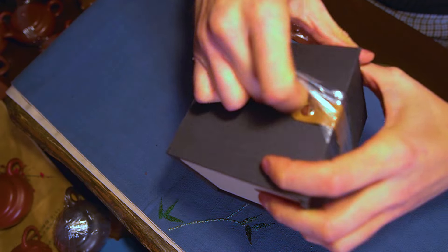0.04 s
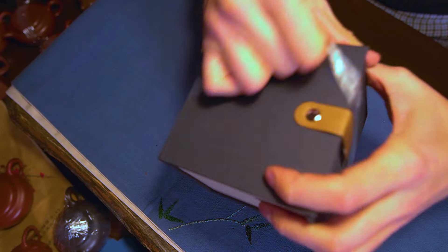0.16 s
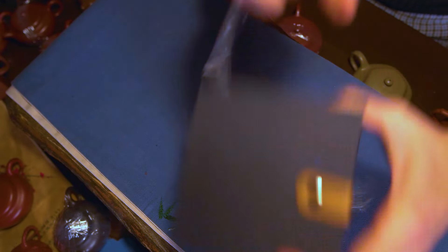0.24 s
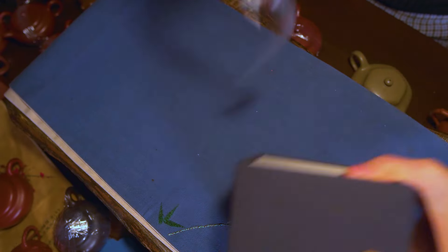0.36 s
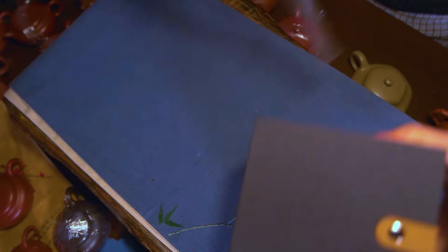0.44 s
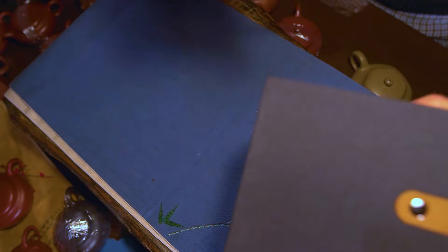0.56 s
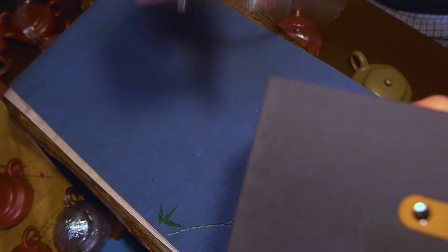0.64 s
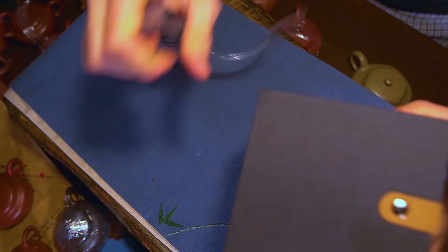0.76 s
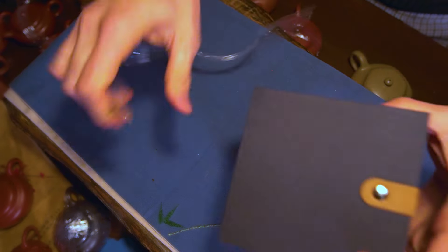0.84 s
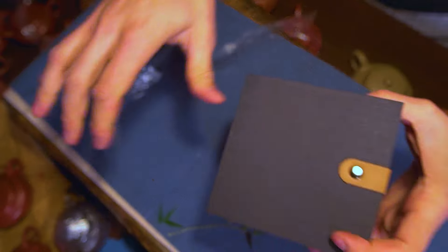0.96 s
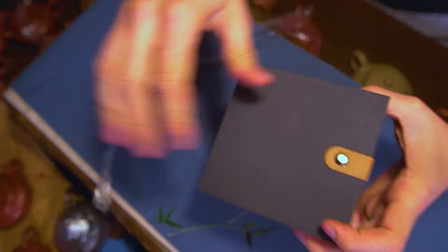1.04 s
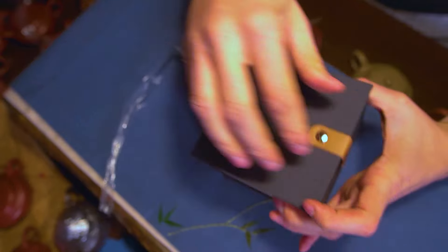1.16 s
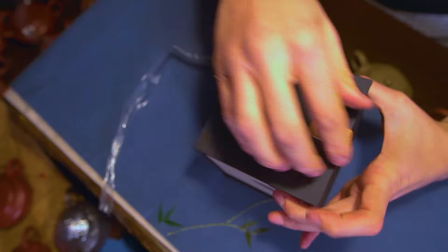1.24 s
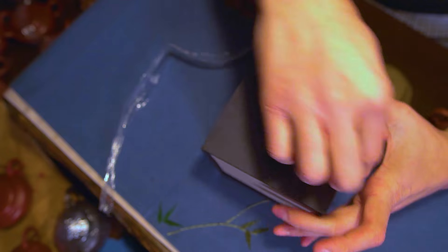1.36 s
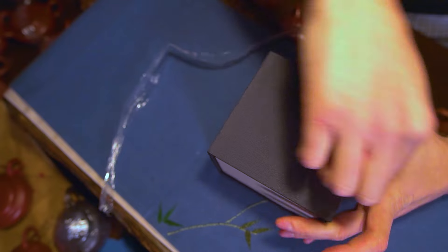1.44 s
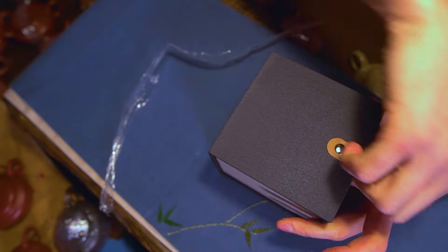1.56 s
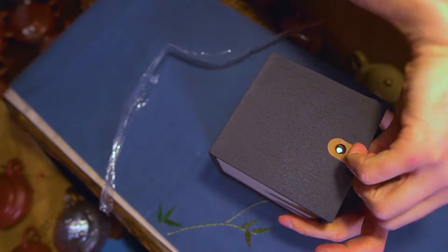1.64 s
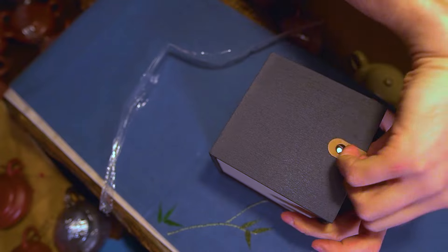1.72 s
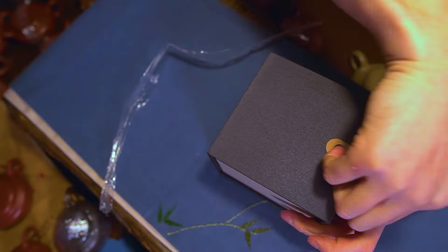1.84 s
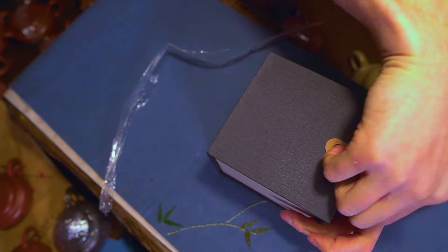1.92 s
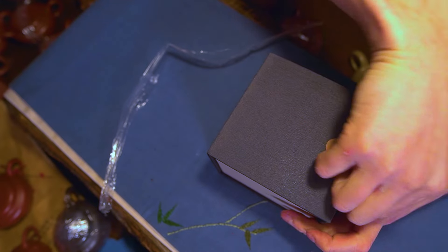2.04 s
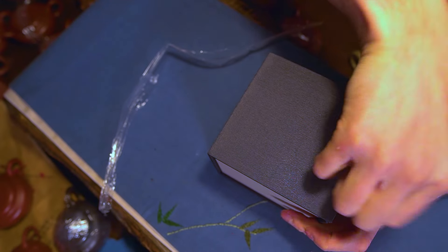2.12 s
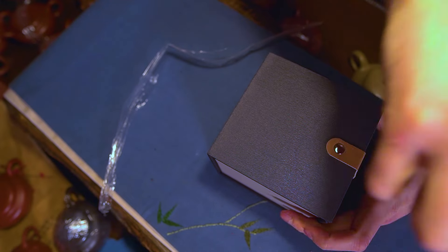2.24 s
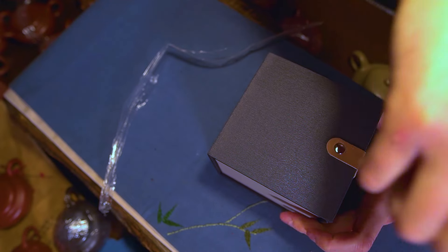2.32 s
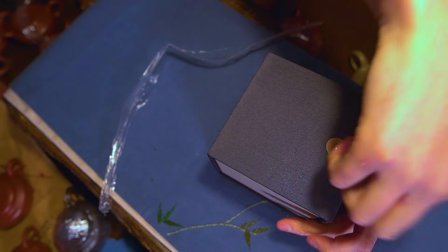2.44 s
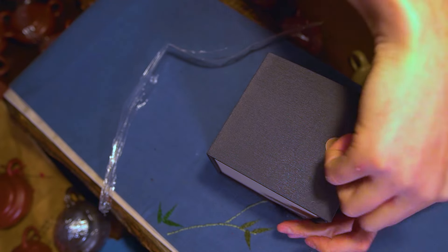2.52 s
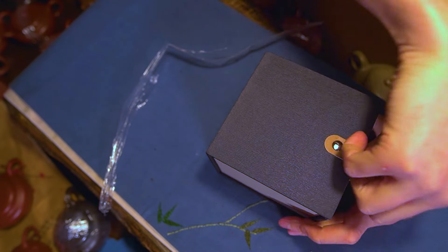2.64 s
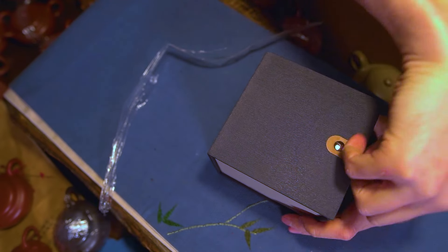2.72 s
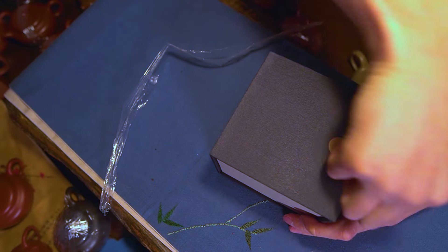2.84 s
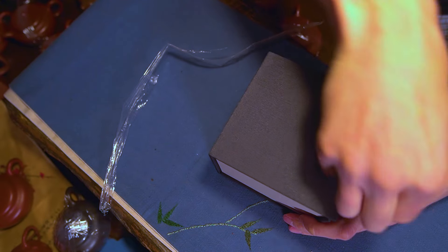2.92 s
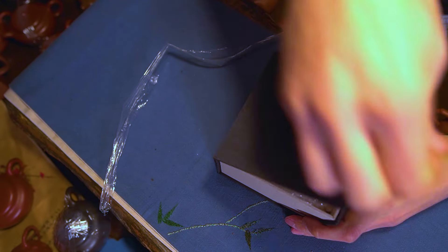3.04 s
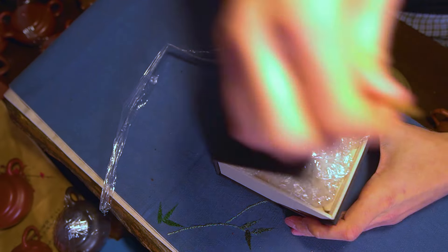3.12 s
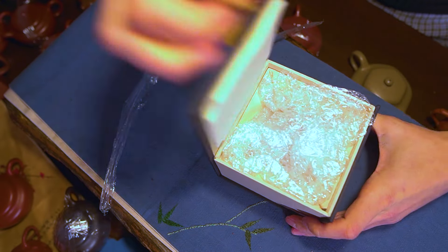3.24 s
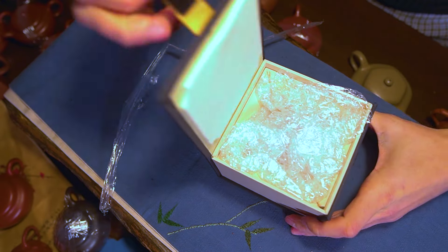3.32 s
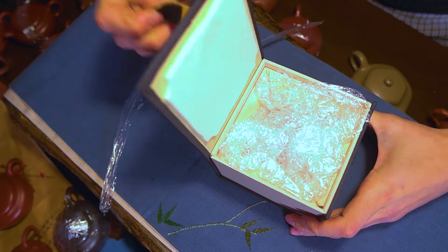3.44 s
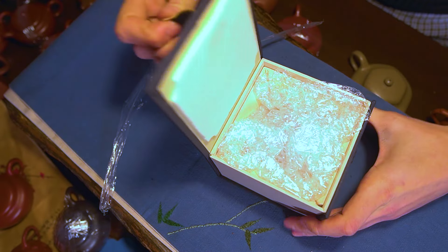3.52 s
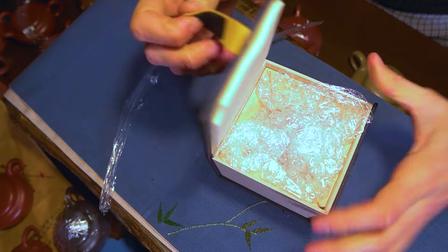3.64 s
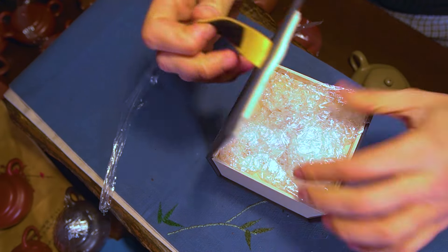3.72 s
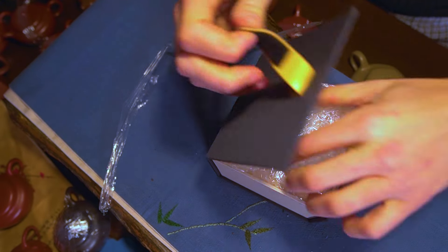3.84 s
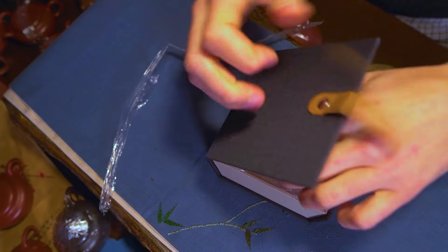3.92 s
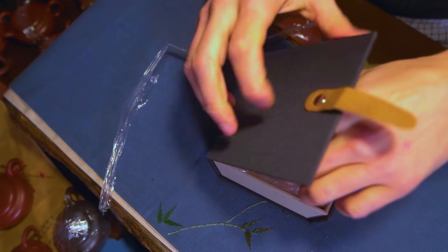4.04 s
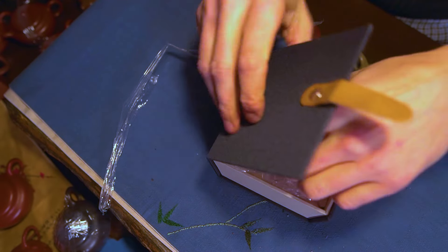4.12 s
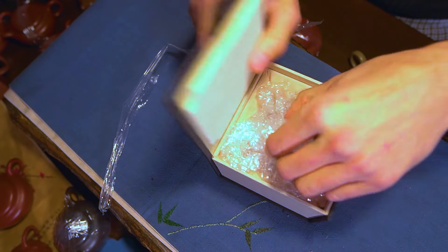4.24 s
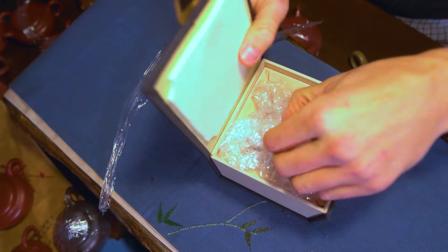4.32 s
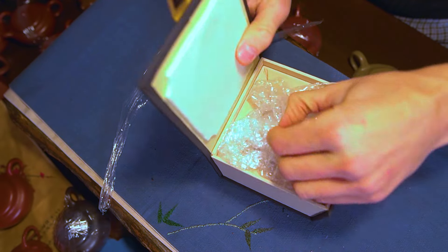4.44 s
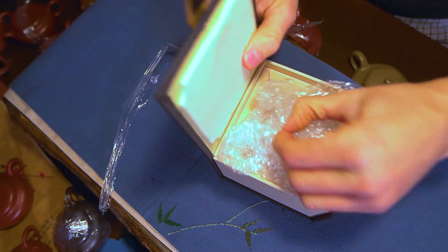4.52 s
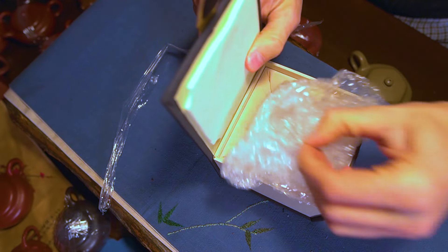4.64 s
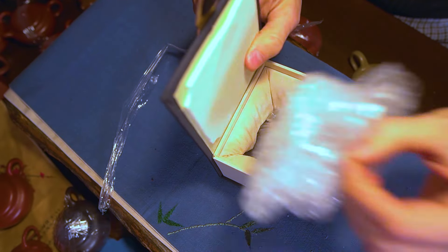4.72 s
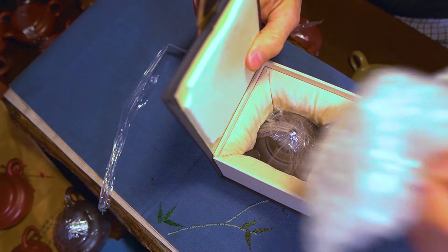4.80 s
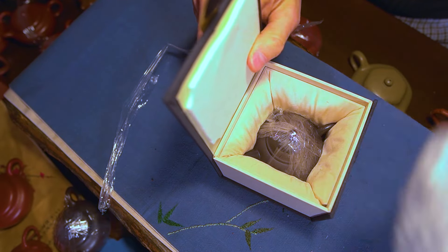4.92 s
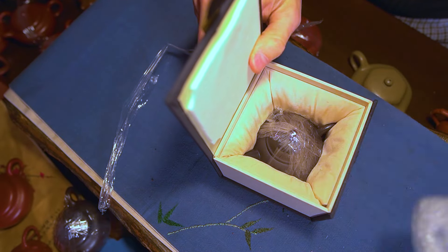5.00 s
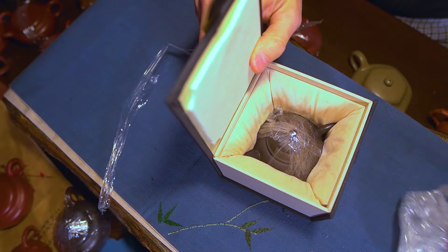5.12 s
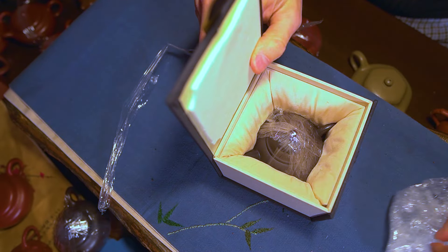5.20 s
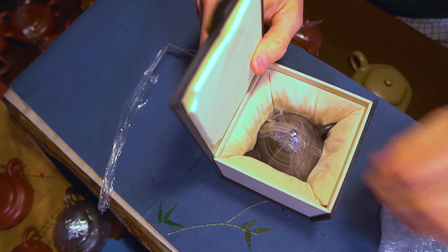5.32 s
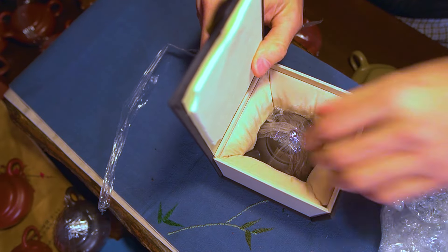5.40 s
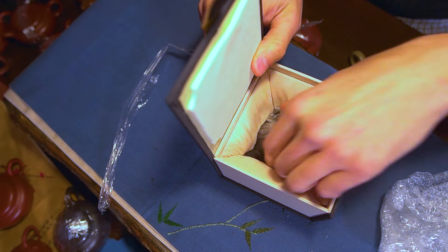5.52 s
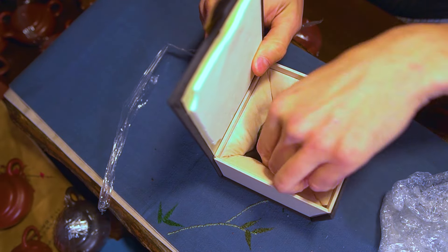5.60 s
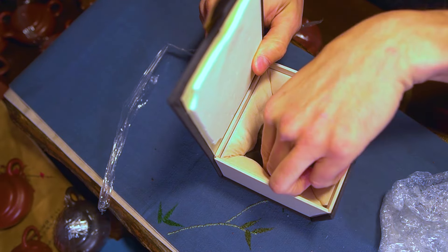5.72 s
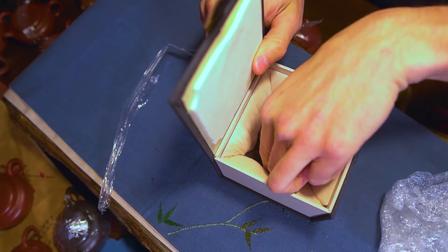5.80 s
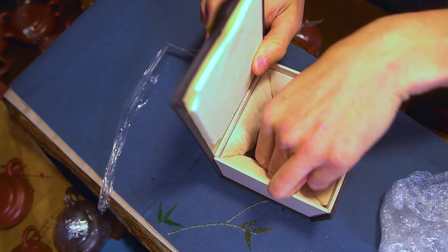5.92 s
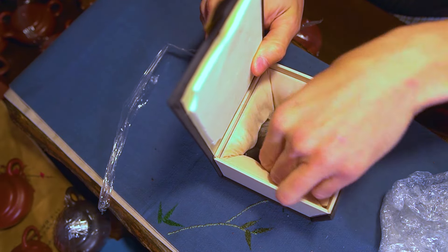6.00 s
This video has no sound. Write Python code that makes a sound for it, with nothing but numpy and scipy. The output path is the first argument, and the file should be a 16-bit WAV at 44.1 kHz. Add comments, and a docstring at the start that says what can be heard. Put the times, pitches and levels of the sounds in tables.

```python
"""Close up at a table, tape is peeled off a cardboard gift box in a dense crackle; the box bumps the table's modes.
The freed strip crinkles as it is laid aside, and fingers brush the lining. The box's leather strap then creaks
over its stud in stick-slip bursts that ring the hollow lid. A pad of bubble wrap is pulled out, crumpling, popping
and fizzing, and is put down; last, fingers rub into the cloth lining. A small room answers over quiet air."""
import sys
import numpy as np
from scipy import signal
from scipy.fft import rfft, irfft, next_fast_len
from scipy.io import wavfile
from scipy.ndimage import uniform_filter1d

SR = 44100
rng = np.random.default_rng(int(sys.argv[2]) if len(sys.argv) > 2 else 0)


def wav_out(sig):
    """Save sig, one row per channel (or a flat mono array), as 16-bit PCM at SR to the path in sys.argv[1]."""
    wavfile.write(sys.argv[1], SR, np.round(np.clip(np.atleast_2d(sig).T, -1, 1) * 32767).astype(np.int16))


N = 267334

# Levels in the tables are relative; some layers also have a trim.
# Gain strokes shared by several sources
STIR_ATTACK_S, STIR_FALL_DB_PER_S = 0.026, 225

# Colour of creasing tape: (frequency [Hz], spectral density [dB])
CRINKLE_COLOUR = [(880, -46), (1500, -34), (2100, -11), (2830, -9), (4080, -3.5), (6000, 5.5), (7840, 4.5),
                  (13800, 7), (16000, -0.5)]
# Colour of rubbed leather: (frequency [Hz], spectral density [dB])
LEATHER_COLOUR = [(400, -15), (900, 7.5), (1080, -2), (1350, -12), (1520, -5), (1780, -11.5), (2200, 3.5),
                  (2600, -3.5), (3000, -5.5), (3400, -7.5), (4800, -6.5), (8000, -10.5), (16000, -16.5)]

# Colour of the glue letting go: (frequency [Hz], spectral density [dB])
TAPE_COLOUR = [(350, -12), (600, -44), (1050, -22), (1230, -5), (1550, 2.5), (2150, 2.5), (2720, 1.5),
               (5790, 2.5), (16000, -1.5)]
# Tape peeling off the box: (time [s], level [dB])
PEEL_LEVEL = [(0.0, -23.5), (0.06, -38), (0.12, -23), (0.16, -37.5), (0.225, -23.5), (0.275, -31),
              (0.32, -21), (0.37, -29), (0.39, -67)]
# Freed strip crinkling as it is carried off: (time [s], level [dB])
STRIP_LEVEL = [(0.38, -40.5), (0.51, -29), (0.58, -47), (0.69, -32), (0.77, -45), (0.87, -44),
               (1.12, -50.5), (1.22, -62)]
# Strip settling on the cloth: (time [s], hold [s], level [dB])
STRIP_SETTLES = [(1.293, 0.098, -45), (1.56, 0.02, -56.5), (1.66, 0.01, -56)]
# Freed strip landing with a short flapping buzz: (time [s], hold [s], level [dB])
FLAP_STROKE = (0.479, 0.052, -34)


def tape():
    """Adhesive fracture: glue lets go in a dense crackle; the freed strip lands with a flap and creases sparsely."""
    tearing = crackle(TAPE_COLOUR, rate=1100, spread_db=6, t60=.005)
    creases = crackle(CRINKLE_COLOUR, rate=650, spread_db=6, t60=.003)
    buckling = pops(rate=450, centre_hz=7000, spread_db=5, cycles=14)
    creases = unit(creases + amp(-4) * buckling)
    buzz_colour = [(2000, -30), (2550, 0), (3000, -1), (3500, -12), (6000, -25)]
    buzz = crackle(buzz_colour, rate=500, spread_db=4, t60=.004)
    settling = sum(stroke(*row, STIR_ATTACK_S, STIR_FALL_DB_PER_S) for row in STRIP_SETTLES)
    loose = level(STRIP_LEVEL) + settling
    flap = stroke(*FLAP_STROKE, attack_s=0.0052, fall_db_per_s=604)
    return amp(-2) * level(PEEL_LEVEL) * tearing + amp(-3.5) * loose * creases + amp(-4.5) * flap * buzz


# Colour of the lower crack: (frequency [Hz], spectral density [dB])
CRACK_COLOUR = [(400, -16), (1000, 12), (2000, 8.5), (4000, 18.5), (7000, -29.5), (14000, -12.5)]
# Creases snapping in tape and wrap: (time [s], tick peak [dB], low crack peak [dB])
CREASE_SNAPS = [(0.021, -15, -41), (0.1247, -6, -43), (0.166, -12.5, -40), (0.196, -10.5, -35),
                (0.2279, -9.5, -20), (0.2586, -16, -30), (0.3106, -37, -27), (0.4853, -17, -33),
                (0.5037, -14, -35), (0.5321, -10, -47), (0.5922, -12.5, -51.5), (0.6227, -13.5, -60),
                (0.6837, -16.5, -39), (0.773, -18.5, -39.5), (0.84, -17.5, -54), (0.878, -17, -51),
                (0.93, -21.5, -46), (1.102, -29.5, -67), (1.366, -26, -57), (3.34, -26, -41.5),
                (3.9387, -20, -34), (4.286, -11.5, -24.5), (4.4083, -19, -27), (4.4426, -11.5, -21.5),
                (4.6734, -17, -18), (4.731, -30, -15.5), (4.762, -40, -25), (4.997, -29, -32),
                (5.0808, -23, -32.5), (5.1683, -23, -34), (5.2114, -22, -31)]
TICK_TRIM_DB, CRACK_TRIM_DB = 0.5, 8


def snaps():
    """Snap-through buckling: single large creases flip over, a bright tick with a lower crack."""
    out = np.zeros((2, N))
    for s, tick_db, crack_db in CREASE_SNAPS:
        tick = stereo(colour(burst(t60=.02), CRINKLE_COLOUR))
        crack = stereo(colour(burst(t60=.016), CRACK_COLOUR))
        add(out, s, amp(tick_db + TICK_TRIM_DB) * tick / np.abs(tick).max())
        add(out, s, amp(crack_db + CRACK_TRIM_DB) * crack / np.abs(crack).max())
    return out


# Tape, then wrap, dragging on the hollow box: (time [s], hold [s], level [dB], swell over the hold [dB])
BOX_DRAGS = [(0.083, 0.35, -38, 13), (3.856, 0.58, -41.5, -1.5), (4.653, 0.15, -33.5, -4.5)]
# Tugs at the strap: (time [s], hold [s], hollow body level [dB], rasp level [dB], swell over the hold [dB])
STRAP_TUGS = [(1.535, 0.046, -45.5, -59, 3.5), (1.624, 0.087, -52.5, -65, 11),
              (1.724, 0.054, -41.5, -43, 7), (1.822, 0.11, -27, -22.5, 3), (2.023, 0.0077, -25, -26, -4.5),
              (2.084, 0.075, -27, -22.5, 0.5), (2.519, 0.15, -42, -52, 11.5),
              (2.691, 0.024, -26.5, -40.5, 6), (2.767, 0.015, -32.5, -37.5, -5),
              (2.785, 0.008, -38, -28, -7), (2.866, 0.11, -18, -25, 4.5)]
TUG_ATTACK_S, TUG_FALL_DB_PER_S, RASP_FALL_DB_PER_S = 0.006, 306, 278
STRAP_PATCHY_DB = 1.2  # rms colour shift with grip


def creak():
    """Stick-slip friction: small slips of strap, tape and wrap drum on the box; the strap rasps at the stud."""
    catches = ticks(rate=350, spread_db=4)
    # soft, dull contacts
    catches = colour(catches, [(500, 5.5), (1000, -0.5), (2000, -9.5), (4000, -8)])
    body = steady(hollow(catches, vary_db=1.57), size=900)
    grain = crackle(LEATHER_COLOUR, rate=600, spread_db=4, t60=.009)
    drag = 0
    for s, hold_s, db, swell_db in BOX_DRAGS:
        drag = drag + stroke(s, hold_s, db, TUG_ATTACK_S, TUG_FALL_DB_PER_S, swell_db)
    rasp = 0
    for s, hold_s, body_db, rasp_db, swell_db in STRAP_TUGS:
        drag = drag + stroke(s, hold_s, body_db, TUG_ATTACK_S, TUG_FALL_DB_PER_S, swell_db)
        rasp = rasp + stroke(s, hold_s, rasp_db, TUG_ATTACK_S, RASP_FALL_DB_PER_S, swell_db)
    return amp(-3) * drag * body + amp(-1.5) * rasp * shifting(grain, STRAP_PATCHY_DB)


# Largest knocks and slips on the box, from tape, strap, wrap and fingers:
# (time [s], body peak [dB], crack peak [dB])
BOX_KNOCKS = [(0.067, -24.5, -59), (0.218, -20, -46), (1.729, -16, -57), (1.744, -18, -41),
              (1.777, -18.5, -35), (1.824, -10.5, -23), (1.852, -19, -23), (1.87, -16, -13),
              (1.92, -11, -14), (2.022, -32, -33), (2.085, -30, -17), (2.094, -16, -12.5),
              (2.135, -16.5, -20), (2.166, -6.5, -44), (2.528, -26.5, -65), (2.686, -34, -28),
              (2.763, -23, -36), (2.785, -30, -18), (2.867, -19, -40), (2.88, -17, -16), (2.918, -14, -9),
              (2.96, -8.5, -21), (2.984, -10, -17.5), (3.019, -28, -41), (3.847, -31.5, -33),
              (4.177, -20, -19.5), (5.548, -28.5, -34)]


def knocks():
    """Impact excitation: each large knock or slip kicks the box and cracks; a weaker crack, a softer, duller kick."""
    out, t = np.zeros((2, N)), np.arange(8192) / SR
    for s, body_db, crack_db in BOX_KNOCKS:
        contact_s = .0001 * np.clip(amp((body_db - crack_db + 8) / 2), .4, 5)
        ring = hollow(t * np.exp(-t / contact_s), vary_db=2.5)
        crack = stereo(colour(burst(t60=.022), LEATHER_COLOUR))
        add(out, s, amp(body_db - 3.5) * ring / np.abs(ring).max())
        add(out, s, amp(crack_db + 1.5) * crack / np.abs(crack).max())
    return out


# Modes of the hollow box: (frequency [Hz], bandwidth [Hz], level [dB])
BOX_MODES = [(366, 5.2, -0.5), (424.4, 84, 0), (458.5, 8.4, 10), (483, 10, -9), (626, 92, -5),
             (791, 52, -8), (895, 12.3, -1), (951, 18, 0), (975, 14, -17), (1340, 17, -59),
             (1526, 15, -33.5), (2107, 35, 5.5), (2853, 133, -5.5)]


def hollow(force, vary_db, low_hz=310):
    """Modal resonance: box modes, randomly weighted for the place touched; so small a box radiates no bass."""
    gains = vary_db * rng.standard_normal(len(BOX_MODES))

    def modes(f):
        total = 0
        for (centre, width, db), gain_db in zip(BOX_MODES, gains):
            damping = 1j * f * width
            total = total + amp(db + gain_db) * damping / (centre * centre - f * f + damping)
        return total
    no_bass = signal.butter(6, low_hz, "high", fs=SR, output="sos")
    return signal.sosfilt(no_bass, filtered(force, modes))


# Stud ringing as the strap comes off: (time [s], hold [s], level [dB])
STUD_STROKE = (2.925, 0.068, -27.5)
# Colour of the stud: (frequency [Hz], spectral density [dB])
STUD_COLOUR = [(700, -29.5), (950, -3), (1040, -4.5), (1100, -9), (1170, -10), (1300, -21), (2500, -25)]


def stud():
    """Friction-driven ringing: the stud rings as the strap is dragged off it."""
    ring = crackle(STUD_COLOUR, rate=500, spread_db=3, t60=.008)
    return stroke(*STUD_STROKE, attack_s=.04, fall_db_per_s=188) * ring


# Colour of the crumpling pockets: (frequency [Hz], spectral density [dB])
CRUMPLE_COLOUR = [(100, -54), (250, -12), (450, -7.5), (600, -23), (800, -3), (1080, -2.5), (1250, -17.5),
                  (1480, 5.5), (1800, -12), (2200, -4), (3100, -0.5), (4500, -5), (6500, -5), (10000, -32)]
# Colour of the thin film: (frequency [Hz], spectral density [dB])
FIZZ_COLOUR = [(2500, -13), (4500, -3), (6500, 2.5), (10000, 2.5), (16000, -1.5)]
# Pulling the bubble wrap out: (time [s], effort [dB])
WRAP_EFFORT = [(3.833, -86), (3.843, -33.5), (4.05, -41.5), (4.1, -32), (4.23, -34), (4.3, -30.5),
               (4.45, -27), (4.56, -31), (4.67, -22.5), (4.75, -24), (4.8, -35), (4.95, -44.5), (5.15, -58)]
# Light stirs, by the lid and as it is put down: (time [s], hold [s], crumple level [dB], fizz level [dB])
WRAP_STIRS = [(3.297, 0.01, -72, -47.5), (3.449, 0.025, -55.5, -45.5), (3.624, 0.008, -62, -58.5),
              (5.007, 0.012, -44, -44.5), (5.104, 0.032, -49, -45), (5.202, 0.034, -29.5, -34),
              (5.284, 0.14, -47, -55), (5.467, 0.02, -50.5, -44)]
MEDIUM_EFFORT_DB = -34
FIZZ_DB, FIZZ_GROWS = -4, 0.98  # fizz relative to medium effort [dB], growth [dB per dB of effort]
WRAP_PATCHY_DB = 2.2  # rms colour shift with folds


def wrap():
    """Film buckling: the pockets crumple and pop in the midrange while the thin film fizzes above."""
    crumple = crackle(CRUMPLE_COLOUR, rate=1500, spread_db=4, t60=.005)
    popping = pops(rate=700, centre_hz=2100, spread_db=5, cycles=14)
    crumple = unit(crumple + amp(-1) * popping)
    fizz = crackle(FIZZ_COLOUR, rate=1400, spread_db=5, t60=.003)
    pockets = level(WRAP_EFFORT)
    film = amp(MEDIUM_EFFORT_DB + FIZZ_DB) * (pockets / amp(MEDIUM_EFFORT_DB)) ** FIZZ_GROWS
    for s, hold_s, crumple_db, fizz_db in WRAP_STIRS:
        stir = stroke(s, hold_s, 0, STIR_ATTACK_S, STIR_FALL_DB_PER_S)
        pockets = pockets + amp(crumple_db) * stir
        film = film + amp(fizz_db) * stir
    return pockets * shifting(crumple, WRAP_PATCHY_DB) + film * fizz


# Colour of rubbed cloth: (frequency [Hz], spectral density [dB])
CLOTH_COLOUR = [(88, -22), (150, -4.5), (186, -6.5), (259, -10.5), (457, -3), (716, -15.5), (1100, -2),
                (1480, -1.5), (1830, -6.5), (2220, -1.5), (5790, -13), (7920, -22), (13700, -26),
                (16000, -25)]
# Fingers brushing card and lining: (time [s], hold [s], level [dB])
FINGER_BRUSHES = [(0.985, 0.027, -48), (1.272, 0.014, -46.5), (1.313, 0.014, -44.5), (5.549, 0.18, -39),
                  (5.761, 0.091, -48.5), (5.852, 0.13, -40.5), (6.036, 0.03, -47.5)]
# Fingers scuffing the card rim: (time [s], hold [s], level [dB])
RIM_STROKE = (5.551, 0.037, -41)
BRUSH_ATTACK_S, BRUSH_FALL_DB_PER_S = 0.0079, 165
CLOTH_PATCHY_DB = 1.8  # rms colour shift with folds and grip


def fingers():
    """Granular friction: skin catches on cloth fibres in fine grains, and more coarsely on the card rim."""
    cloth = crackle(CLOTH_COLOUR, rate=3000, spread_db=4, t60=.004)
    card_colour = [(250, -30), (400, -16), (600, -1), (850, -1), (1200, -26), (3000, -21.5)]
    card = crackle(card_colour, rate=700, spread_db=3, t60=.016)
    brush = sum(stroke(*row, BRUSH_ATTACK_S, BRUSH_FALL_DB_PER_S) for row in FINGER_BRUSHES)
    scuff = stroke(*RIM_STROKE, attack_s=0.0054, fall_db_per_s=165)
    return amp(-3.5) * brush * shifting(cloth, CLOTH_PATCHY_DB) + scuff * card


# Modes of the table with the box on it: (frequency [Hz], level [dB], undamped t60 [s])
TABLE_MODES = [(48.1, -7, 0.64), (112, 0.5, 0.31), (139.3, -6, 0.32), (186.1, 6.5, 0.28), (245.4, 6, 0.14),
               (314.5, 0, 0.12), (335.6, 5.5, 0.19), (419, -11, 0.32), (500, -12, 0.31), (610, -7.5, 0.1),
               (780, -12, 0.16), (850, -15.5, 0.41)]
# Box bumping the table: (time [s], level [dB], contact cut-off [Hz],
# share of ring time left by the holding hand [0-1, at least 0.1 is used])
TABLE_BUMPS = [(0.133, -26.5, 420, 0.42), (0.282, -28.5, 420, .6), (0.379, -7.5, 483, 1),
               (0.393, -7.5, 490, 0.34), (1.235, -10, 101, 0.27), (1.26, -17, 70, 0.78),
               (2.172, -22.5, 330, .48), (2.195, -12.5, 45, 0.48), (2.531, -24, 49.5, .9),
               (2.573, -18.5, 297, 0.42), (2.587, -9, 300, 0.09), (2.977, -27, 55, .96),
               (4.0, -15, 125, 0.16), (4.05, -28, 65, 1), (4.178, -23, 81, 0.4), (4.662, -37, 240, 0.8),
               (4.737, -27.5, 223, 0.63), (5.593, -31, 80, 0.55), (5.871, -35, 100, .96)]
# Box dragged over the cloth: (time [s], hold [s], level [dB])
SLIDE_STROKE = (0.925, 0.099, -51.5)


def table():
    """Modal impact: bumps ring the table and jostle what stands on it; sliding gives a faint low groan."""
    out, t = np.zeros(N), np.arange(SR) / SR
    rattle_colour = [(40, -18), (150, 11), (400, 10.0), (900, 8), (1400, -84.5)]
    for s, db, contact_hz, free in TABLE_BUMPS:
        def reach(hz):
            # soft contact reaches only the low modes, a quick rebound barely moves the lowest
            softness = 1 / np.hypot(1, (hz / contact_hz) ** 2)
            return softness * hz / np.hypot(hz, contact_hz / 4)
        age = t / np.clip(free, .1, 1)
        ring = 0
        for hz, mode_db, t60 in TABLE_MODES:
            ring = ring + amp(mode_db - 60 * age / t60) * reach(hz) * np.sin(2 * np.pi * hz * t)
        rattle = filtered(unit(colour(rng.standard_normal(SR), rattle_colour)), reach)
        jostle = amp(-9.5 - 60 * age / .3) * rattle
        onset = 1 - np.exp(-t / 0.0037)
        add(out, s, amp(db - 6.0) * (ring + jostle) * onset)
    groan_colour = [(150, -53), (200, -8.0), (217, 7.0), (235, -13.0), (320, -41.5)]
    groan = steady(colour(rng.standard_normal(N), groan_colour))
    bumps = signal.sosfilt(signal.butter(2, 32, "high", fs=SR, output="sos"), out)
    return bumps + stroke(*SLIDE_STROKE, attack_s=.03, fall_db_per_s=250) * groan


# Reverberation: (frequency [Hz], t60 [s])
ROOM_T60 = [(150, 0.16), (1000, 0.29), (4000, 0.33), (15000, 0.14)]


def room(x, size=16384):
    """Reverberation: a noise tail, each frequency dying at its own speed, is redrawn for every block of sound."""
    out = np.zeros((2, N))
    for start in range(0, N, size):
        hz, t, z = signal.stft(rng.standard_normal((2, size)), SR, nperseg=256)
        decay = amp(-60 * t / along(ROOM_T60, hz)[:, None])
        tail = stereo(signal.istft(z * decay, SR, nperseg=256)[1])
        tail = tail / np.linalg.norm(tail[0])
        answer = signal.fftconvolve(x[:, start:start + size], tail, axes=1)
        add(out, start / SR + .005, answer)  # the tail starts 5 ms late
    return colour(out, [(100, -1.0), (450, -7), (1000, -0.5), (12000, 6.5)])


# Colour of the room air: (frequency [Hz], spectral density [dB])
AIR_COLOUR = [(15, -35), (25, -8.5), (102, -2.5), (545, -8), (641, -18), (695, -12.5), (796, -10.5),
              (1160, -19), (1400, -13.5), (1890, -14.5), (2410, -18), (14000, -24.5), (16000, -26)]


def air():
    """Stationary noise: steady, coloured room air; rms 1."""
    return unit(stereo(colour(rng.standard_normal((2, N)), AIR_COLOUR)))


def crackle(spectrum, rate, spread_db, t60):
    """Shot noise: tiny creases fire at random, each a fresh burst that dies at once; rms about 1."""
    fade = amp(-120 / (abs(t60) * SR))  # acts on energy, hence twice 60 dB
    energy = signal.lfilter([1], [1, -fade], ticks(rate, spread_db) ** 2)
    grain = np.sqrt(energy) * rng.standard_normal((2, N))
    return steady(stereo(colour(grain, spectrum)))


def pops(rate, centre_hz, spread_db, cycles):
    """Damped oscillation: patches of film buckle at random, each ringing at its own pitch; rms about 1."""
    count = int(rate * N / SR)
    starts = rng.integers(0, N, count)
    pitch, size, side = np.clip(rng.standard_normal((count, 3)), -2, 2).T[:, :, None]
    n = np.arange(200)
    turns = centre_hz * 2 ** (.6 * pitch) * n / SR
    rings = amp(spread_db * size - 60 * turns / cycles) * np.sin(2 * np.pi * turns)
    where = (starts[:, None] + n).ravel()
    pair = []
    for lean_db in (-3, 3):  # left, right
        pair.append(np.bincount(where, (rings * amp(lean_db * side)).ravel(), N)[:N])
    no_bass = signal.butter(2, centre_hz * .45, "high", fs=SR, output="sos")
    return steady(signal.sosfilt(no_bass, np.array(pair)))


def ticks(rate, spread_db):
    """Random point process: impulses at random moments with widely scattered sizes."""
    sizes_db = spread_db * np.clip(rng.standard_normal(N), -2.3, 2.3)
    return (rng.random(N) < rate / SR) * amp(sizes_db)


def burst(t60):
    """Exponential decay: one tiny fracture as a pair of fast-dying noises."""
    t = np.arange(2048) / SR
    return rng.standard_normal((2, len(t))) * amp(-60 * t / t60)


def stroke(s, hold_s, db, attack_s, fall_db_per_s, swell_db=0):
    """Envelope of one movement: gain rises up to time s, holds or swells, then dies away."""
    age = np.arange(N) / SR - s
    hold_s = abs(hold_s) + 1e-4
    rise_db = 20 * np.minimum(age, 0) / abs(attack_s)
    held_db = swell_db * (np.clip(age / hold_s, 0, 1) - .5)
    fall_db = abs(fall_db_per_s) * np.maximum(age - hold_s, 0)
    return amp(np.maximum(db + rise_db + held_db - fall_db, -150))


def shifting(x, patchy_db):
    """Spectral modulation: folds and grip keep changing, so narrow bands swell and fade a little; rms about 1."""
    z = signal.stft(x, nperseg=1024)[2]
    field = rng.standard_normal(z.shape[1:])
    for _ in range(2):
        field = uniform_filter1d(uniform_filter1d(field, size=4, axis=0), size=4, axis=1)
    return steady(signal.istft(z * amp(patchy_db * unit(field)), nperseg=1024)[1][:, :N])


def steady(x, size=1400):
    """Level equalization: even out slow level changes and keep the grain."""
    power = uniform_filter1d(np.mean(np.atleast_2d(x) ** 2, axis=0), size)
    return x / np.sqrt(np.abs(power) + 1e-3 * np.mean(power))


# Likeness of the two channels: (frequency [Hz], left-right likeness [0-1])
CHANNEL_LIKENESS = [(200, 0.83), (640, 0.6), (1400, 0.71), (3100, 0.71), (7000, 0.22), (15000, 0.073)]


def stereo(pair):
    """Interchannel coherence: two unrelated signals become left and right, alike in the bass, apart in the treble."""
    def mid_side(hz):
        turn = np.arccos(np.clip(along(CHANNEL_LIKENESS, hz), -1, 1)) / 2
        return np.array([np.cos(turn), np.sin(turn)])
    mid, side = filtered(pair, mid_side)
    return np.array([mid + side, mid - side])


def colour(x, spectrum):
    """Minimum-phase filtering: a causal filter with the given spectrum, so attacks stay sharp."""
    def response(hz):
        cepstrum = irfft(np.log(amp(along(spectrum, hz))))
        half = len(cepstrum) // 2
        return np.exp(rfft(np.r_[cepstrum[0], 2 * cepstrum[1:half], np.zeros(half)]))
    return filtered(x, response)


def filtered(x, response):
    """Linear filtering: x times a complex response of frequency."""
    n = x.shape[-1]
    m = 2 * next_fast_len(n // 2 + 4096)
    return irfft(rfft(x, m) * response(np.fft.rfftfreq(m, 1 / SR)), m)[..., :n]


def along(points, hz):
    """Logarithmic frequency scale: interpolate (Hz, value) points."""
    f, v = np.transpose(points)
    return np.interp(np.log(hz + 1), np.log(f + 1), v)


def level(curve):
    """Envelope: gain per sample from a (s, dB) curve, silent outside it."""
    return amp(np.interp(np.arange(N) / SR, *np.transpose(curve), left=-150, right=-150))


def amp(db):
    """Logarithmic level: decibels to gain."""
    return 10 ** (np.asarray(db) / 20)


def unit(x):
    """Normalization: scale to rms 1."""
    return x / np.sqrt(np.mean(x ** 2) + 1e-20)


def add(track, s, sound):
    """Superposition: mix a sound into the track at time s."""
    start = max(0, round(s * SR))
    part = sound[..., :N - start]
    track[..., start:start + part.shape[-1]] += part


# Where the hands work: (time [s], left minus right level [dB])
HAND_PLACE = [(0, -2), (0.9, 0), (1.8, -2.7), (2.95, -2.9), (3.4, -0.5), (3.9, -3.2), (4.7, -2.4),
              (5.2, -5), (5.6, -2.5)]
ROOM_DB, AIR_DB = -9, -57.5


def scene():
    """Superposition: hands and box, panned by level difference, with room, table and quiet air."""
    pan_db = np.interp(np.arange(N) / SR, *np.transpose(HAND_PLACE))
    handling = tape() + snaps() + creak() + stud() + knocks() + wrap() + fingers()
    handling = handling * amp([pan_db / 2, -pan_db / 2])
    return handling + amp(ROOM_DB) * room(handling) + table() + amp(AIR_DB) * air()


TOP_HZ = 16050


def record(dry):
    """Band limiting: the recorder keeps nothing from its upper limit on."""
    return filtered(dry, lambda hz: hz < TOP_HZ)


dry = scene()
out = record(dry)
wav_out(out)
```